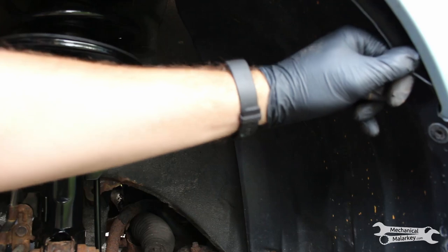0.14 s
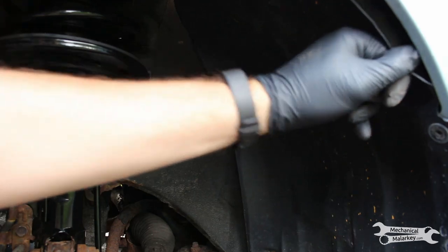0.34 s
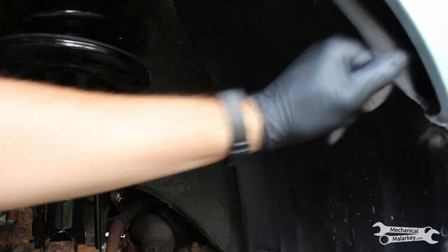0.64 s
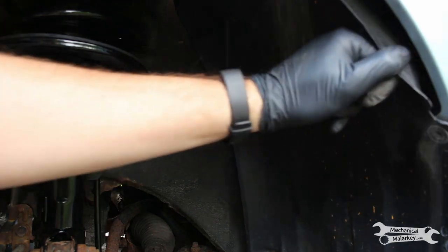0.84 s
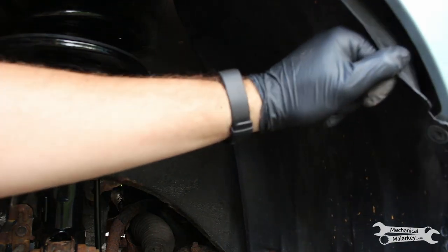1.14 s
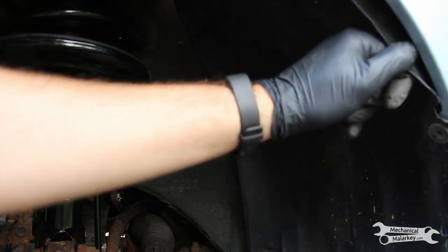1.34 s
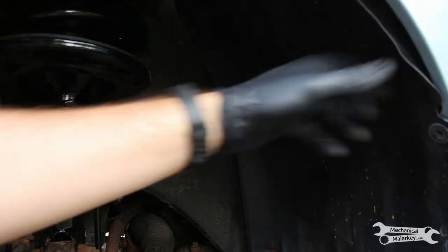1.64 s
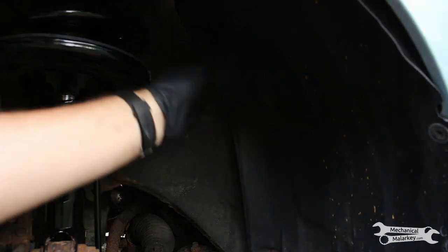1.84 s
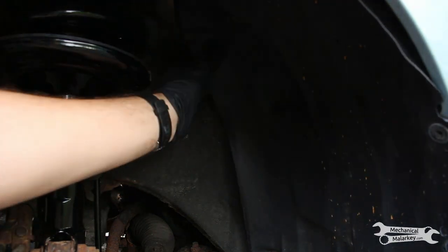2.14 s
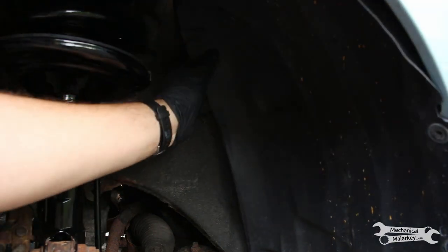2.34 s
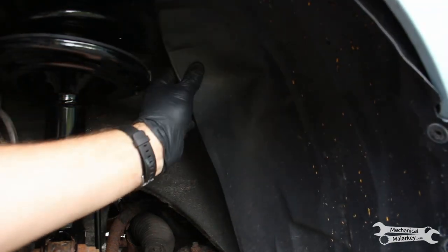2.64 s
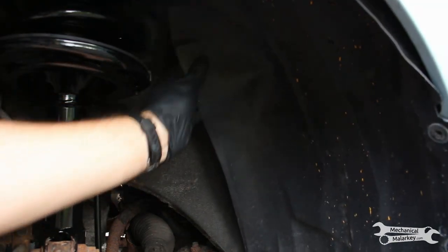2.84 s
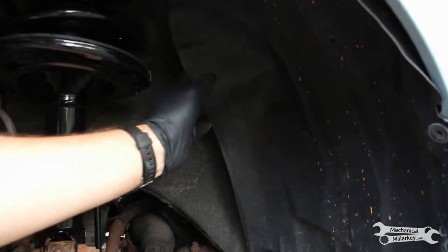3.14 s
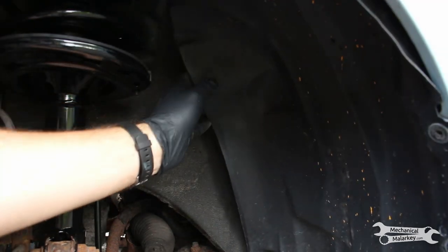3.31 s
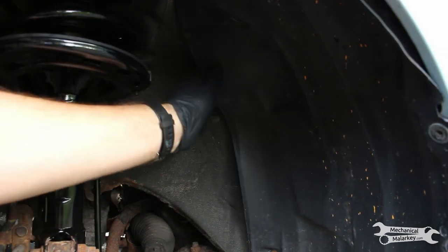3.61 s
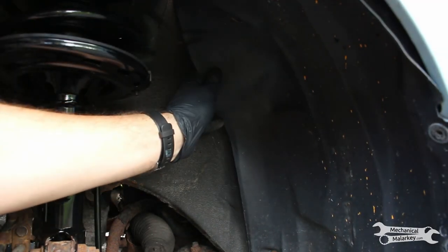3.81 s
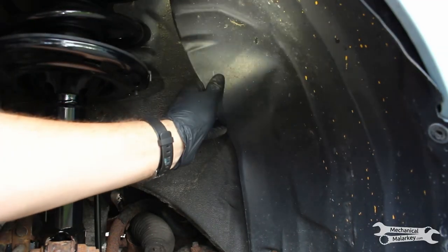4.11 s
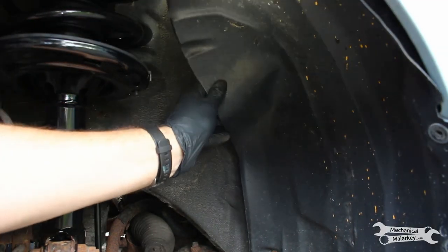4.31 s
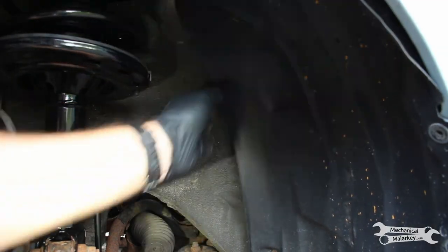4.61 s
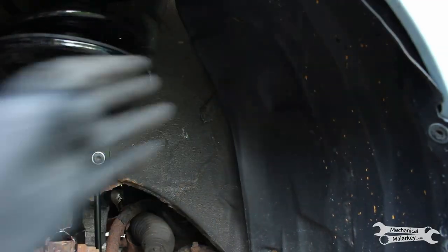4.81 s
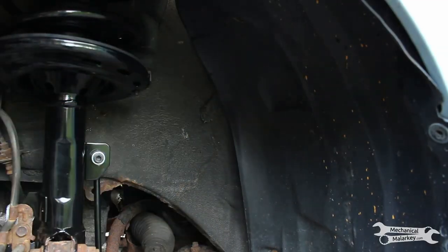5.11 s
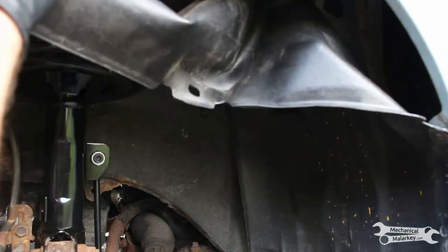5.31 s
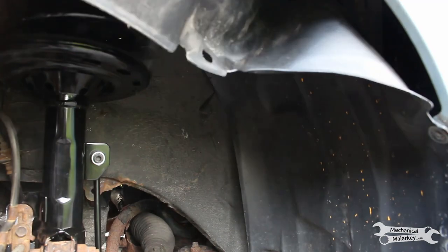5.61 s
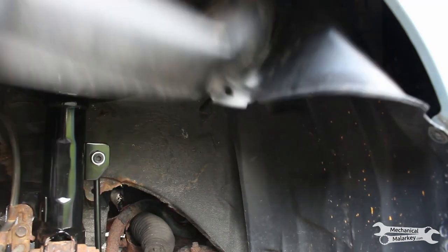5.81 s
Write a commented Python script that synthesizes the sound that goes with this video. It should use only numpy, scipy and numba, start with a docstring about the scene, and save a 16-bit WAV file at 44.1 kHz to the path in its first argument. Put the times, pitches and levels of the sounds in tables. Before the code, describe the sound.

Thin, stiff plastic sheet is bent in short jerky strokes, creaking, rubbing and knocking hollowly against a car's wheel well. The loudest cracks come early and near the end, clipping and briefly ducking the sound; between them are lighter scrapes and clicks. Close stereo microphone in an open garage with a dull tail, faint air, distant traffic, small bird chirps and cricket pulses.

```python
"""A plastic fender liner is bent and pulled out of a car's wheel well by a gloved hand, close to the microphone.
Pulls are stick-slip noise and blows are single impulses with a noisy rattle; both ring the modes of the sheet.
Low booms and ringing tones, one decaying sine each, lie under some blows; the open garage adds a dull noise tail.
Farther off: filtered-noise air and traffic, a wavering sine hum, gliding bird notes, cricket pulses and a thin trill.
Two channels share the scene, each with its own hiss; the recorder ducks and clips on the hardest snaps."""
import sys
import numpy as np
from scipy import signal
from scipy.fft import rfft, irfft
from scipy.io import wavfile
from scipy.ndimage import uniform_filter1d
from numba import njit

SR = 44100
rng = np.random.default_rng(int(sys.argv[2]) if len(sys.argv) > 2 else 0)


def digitize_waveform(pressure):
    """Quantize a signal to 16-bit integers and store it at the path in sys.argv[1].

    Rows of a 2-D input are taken as channels; values are limited to [-1, 1].
    """
    field = np.atleast_2d(pressure).T
    bounded = np.clip(field, -1, 1)
    quanta = np.round(bounded * 32767).astype(np.int16)
    wavfile.write(sys.argv[1], SR, quanta)


N = 262395
TIME = np.arange(N) / SR

# steady air of the garage: [f/Hz, relative density/dB]
AIR_COLOUR = [(25, -46), (55, -14), (90, 1.5), (130, 0.5), (260, 0), (330, 4.5), (470, -13.5), (600, -9),
              (950, -6), (1800, -16.5), (4000, -22), (16000, -29)]
# low hum and distant traffic over time: [t/s, hum level/dB, traffic level/dB]
BACKGROUND_LEVELS = [(0, -51, -45), (0.9, -48.5, -56), (1.801, -44, -48.5), (2.8, -51.5, -45),
                     (3.5, -49, -44), (4.3, -54, -41), (4.9, -48.5, -53.5), (5.95, -86, -44)]
# self-noise of each microphone channel: [f/Hz, relative density/dB]
SELF_NOISE_COLOUR = [(25, 10), (150, 4), (400, -2), (1500, -6.5), (16000, 1.5)]
# each pull or slide of the hand:
# [start t/s, length t/s, rubbing level/dB, drumming re rubbing level/dB, hiss re rubbing level/dB]
HAND_STROKES = [(0, 0.04, -31, -13, -24), (0.076, 0.045, -22.5, 0, -16.5), (0.332, 0.041, -25, -2.5, -22),
                (0.437, 0.062, -30, 0.5, -26.5), (0.525, 0.16, -28.5, -0.5, -19.5),
                (0.67, .17, -28, -6, -19), (0.838, 0.32, -35.5, -4.5, -19), (1.292, 0.09, -37.5, 2, -17),
                (1.599, 0.039, -27, 1, -13), (1.98, 0.097, -34, -4, -29), (2.094, 0.097, -28.5, -1, -19),
                (2.172, 0.084, -30.5, 1, -17), (2.334, 0.069, -27, -2.5, -22.5),
                (2.411, 0.083, -29.5, 6.5, -19), (2.554, 0.12, -30, -2, -24),
                (2.989, 0.03, -28.5, -16, -22), (3.036, 0.041, -26.5, -6, -18),
                (3.201, 0.037, -29.5, -2.5, -13.5), (3.399, 0.096, -29, -2.5, -18),
                (3.508, 0.053, -26.5, 4, -23), (3.586, 0.13, -38, 2, -9), (3.697, 0.15, -48.5, 4, -2),
                (4.047, .04, -34, 4, -16), (4.495, 0.21, -32, -4, -16), (4.605, 0.058, -17.5, -1, -15),
                (4.709, 0.033, -29.5, 1, -18), (5.062, 0.12, -51, -6, 6), (5.303, 0.098, -27.5, -0.5, -19),
                (5.444, 0.052, -36.5, -9, -24), (5.504, 0.082, -30.5, -13, -9.5),
                (5.587, 0.073, -24.5, -2, -9), (5.677, 0.1, -37.5, 0, -13), (5.794, 0.16, -25.5, -6.5, -25)]
# dying away after a stroke, lows slowly and hiss quickly: [T60/s] for drumming, knock, crack, tick
RELEASE_TIMES = [0.2, 0.15, 0.11, 0.072]
# borders between drumming, knock, crack and tick: [f/Hz]
RANGE_EDGES = [450, 1500, 5000]
# modes of the liner in its well, before bending: [f/Hz, T60/s, relative level/dB]
LINER_MODES = [(168, 0.26, -20), (278.3, 0.17, -7), (336.9, 0.21, 10.5), (361, 0.031, 0), (558, 0.017, 5),
               (641, 0.22, 5), (760, 0.03, 0), (841, 0.037, 1.5), (960, 0.19, 5.5), (1177, 0.075, -5),
               (1420, 0.21, -35), (1676, 0.43, -1), (2186, 0.078, 1.5), (2794, 0.047, -3.5),
               (3540, 0.066, -17), (4630, 0.082, -6)]
# broad colour of the sheet: [f/Hz, level/dB]
SHEET_COLOUR = [(30, -30), (70, -10.5), (130, -2), (300, 1.5), (480, 0.5), (650, 6.5), (1200, 1),
                (2000, -9.5), (3200, -12.5), (5000, -21.5), (8000, -24.5), (13000, -29), (16000, -39)]
# the broad sheet bumps against the well: [t/s, strength level/dB, hardness/(dB per range), rattle T60/s]
SHEET_KNOCKS = [(0.0211, -23.5, -0.5, 0.048), (0.0882, -24.5, 3.5, 0.068), (0.533, -19, 2, 0.057),
                (1.962, -21, -3, 0.14), (2.434, -15, -5.5, 0.044), (3.538, -29, -4, 0.026),
                (4.385, -29, 5.5, 0.056), (4.668, -10, -1.5, 0.061), (4.962, -11.5, -7.5, 0.11),
                (4.976, -18, 2.5, 0.067), (5.313, -20.5, 4, 0.091), (5.608, -17.5, 4, 0.063),
                (5.88, -15, -4.5, 0.018), (5.92, -16, 4, 0.032)]
# the bent edge sticks and snaps free: [t/s, strength level/dB, hardness/(dB per range), rattle T60/s]
EDGE_SNAPS = [(0.5198, -19.5, -11.5, 0.11), (0.579, -25.5, 3.5, 0.064), (0.6658, -3.5, 4.5, 0.086),
              (0.788, -38.5, 3, .1), (0.922, -13, 1, 0.073), (0.962, -32.5, 7.5, 0.018),
              (0.9956, -15, 1, 0.077), (1.007, -25.5, -7, 0.029), (1.04, -22, 1, 0.043),
              (1.056, -34, -2, 0.05), (1.102, -22.5, -6.5, .03), (1.1373, -26.5, 1.5, 0.049),
              (1.163, -29.5, -7, 0.027), (1.2558, -15, 1, .055), (1.303, -28.5, 3.5, 0.077),
              (1.329, -33, 3.5, 0.022), (1.348, -29.5, -5, .06), (1.361, -32, 2.5, 0.059),
              (1.625, -22.5, -0.5, 0.062), (3.044, -24.5, 2.5, 0.055), (4.62, -23, -1, 0.1),
              (5.768, -16, 2.5, 0.38), (5.778, -8, -7, 0.099)]
# clips and hard rims click: [t/s, strength level/dB, hardness/(dB per range), rattle T60/s]
CLIP_CLICKS = [(0.6627, -11.5, -4, 0.079), (0.863, -41, 3, 0.11), (1.231, -49, 6.5, 0.06),
               (1.41, -58, 7.5, 0.04), (2.066, -41.5, 3.5, 0.056), (2.497, -30.5, -2.5, 0.057),
               (2.651, -31, -4, 0.046), (2.704, -25, -6.5, 0.047), (2.83, -30.5, -2.5, 0.071),
               (2.8835, -20, -6, 0.086), (2.929, -24.5, -3, 0.065), (3.241, -29.5, -5, 0.044),
               (3.6444, -22, -2.5, 0.042), (3.886, -50, 7, 0.061), (4.0209, -40, 5, 0.011),
               (4.201, -46.5, 5.5, 0.019), (4.952, -49.5, 2, .02), (5.373, -26, -2.5, 0.045),
               (5.474, -45.5, 3.5, 0.051), (5.563, -27, -1, 0.18), (5.792, -8, -1.5, 0.075),
               (5.805, -8.5, -5, 0.051)]
# colour of each kind of blow: [drumming, knock, crack, tick relative level/dB]
KNOCK_COLOUR = [-5, -1, -20, -37.5]
SNAP_COLOUR = [-17.5, 0, -6.5, -26.5]
CLICK_COLOUR = [-7, -1, -0.5, -4]
# low booms and ringing tones under some blows: [t/s, f/Hz, level/dB, T60/s]
BOOMS_AND_RINGS = [(0.112, 137, -19.5, 0.2), (0.129, 107, -20, 0.2), (0.661, 56, -11, 0.043),
                   (1.258, 612.5, -9, 0.11), (2.366, 239, -12, 0.11), (2.439, 203, -26.5, .16),
                   (3.047, 556, -11.5, 0.13), (4.672, 306, -14, 0.17), (4.964, 322, -16, 0.27),
                   (5.791, 265, -10, 0.18)]
# bird chirps: [middle t/s, middle f/Hz, glide/octaves, relative level/dB]
BIRD_CHIRPS = [(0.333, 4600, -0.11, -43), (0.418, 5300, 0.1, -38), (1.673, 4700, -0.22, -36),
               (1.724, 4640, -0.31, -38), (1.752, 5280, -0.21, -36.5), (1.784, 4840, -.2, -38.5),
               (2.208, 5200, 0.058, -39), (2.262, 5300, .14, -38), (2.478, 4630, -0.17, -39),
               (2.525, 4680, -0.19, -42), (2.582, 4600, -0.15, -36), (2.636, 4700, -0.15, -34),
               (3.128, 5050, 0.19, -41), (3.365, 4750, 0.2, -47), (3.4, 4750, -.18, -43),
               (3.515, 4670, -.16, -38), (3.563, 4800, -.18, -39), (3.617, 4780, -.18, -35),
               (3.675, 4750, -0.12, -39)]
# cricket pulses: [middle t/s, level/dB]
CRICKET_PULSES = [(1.465, -58), (1.515, -52), (1.565, -52), (2.289, -50), (2.975, -48), (3.03, -49),
                  (3.99, -55)]


def undb(db):
    """Decibels to gain."""
    return 10 ** (np.asarray(db) / 20)


def unit(x):
    """Scale to an rms of one."""
    return x / np.sqrt(np.mean(x ** 2) + 1e-20)


def fade(t, t60):
    """Exponential decay, 60 dB down after t60 (2 ms at least)."""
    return np.exp(-np.log(1000) * t / max(t60, .002))


def add(track, s, x):
    """Mix x into the track from time s."""
    i = int(np.clip(s * SR, 0, N - 1))
    track[i:i + len(x)] += x[:N - i]


def colour(x, points, size=4096):
    """Causal minimum-phase filter with a smooth (f/Hz, level/dB) response."""
    hz, db = np.transpose(points)
    grid = np.maximum(np.fft.rfftfreq(size, 1 / SR), 1)
    log_gain = np.log(undb(np.interp(np.log(grid), np.log(hz), db)))
    # folding the cepstrum forward in time makes the filter causal
    cepstrum = irfft(log_gain)
    cepstrum[1:size // 2] *= 2
    cepstrum[size // 2 + 1:] = 0
    response = irfft(np.exp(rfft(cepstrum)))
    return signal.fftconvolve(x, response)[:len(x)]


def ranges(x):
    """Split into drumming, knock, crack and tick ranges."""
    a, b, c = RANGE_EDGES
    shapes = [(a, "low"), ([a, b], "band"), ([b, c], "band"), (c, "high")]
    filters = [signal.butter(3, hz, kind, fs=SR, output="sos") for hz, kind in shapes]
    return [signal.sosfilt(sos, x) for sos in filters]


def walk(rate):
    """Smoothed random steps, rate per second, with an rms near one."""
    k = int(SR / rate)
    steps = np.repeat(rng.standard_normal(N // k + 1), k)
    return unit(uniform_filter1d(steps, k)[:N])


def garage(x, room_db=-19, t60=0.85):
    """Dull reverberation from the walls: a decaying noise tail with a 10 ms rise."""
    t = TIME[:SR]
    tail = rng.standard_normal(len(t)) * fade(t, t60) * np.minimum(t / 0.01, 1)
    wet = signal.fftconvolve(x, tail / np.linalg.norm(tail))[:N]
    return x + undb(room_db) * colour(wet, [(400, -17.0), (1500, -1), (6000, -33)])


def air(level_db=-43.5):
    """Steady air of the garage: coloured noise whose level drifts slightly."""
    return unit(colour(rng.standard_normal(N), AIR_COLOUR)) * undb(level_db + 1.9 * walk(2.87))


def hum(mean_hz=124):
    """A faint low sine, wavering in pitch and level."""
    s, level_db, _ = np.transpose(BACKGROUND_LEVELS)
    hz = mean_hz * (1 + 0.0383 * walk(25.15))
    tone = np.sin(2 * np.pi * np.cumsum(hz) / SR)
    return unit(tone * undb(1.3 * walk(14))) * undb(np.interp(TIME, s, level_db))


def traffic():
    """Distant traffic: noise strongest around 650 Hz, swelling and sinking."""
    s, _, level_db = np.transpose(BACKGROUND_LEVELS)
    points = [(100, -22), (350, 0), (650, 5.0), (900, -2.5), (1500, -14.5), (4000, -28.5)]
    return unit(colour(rng.standard_normal(N), points)) * undb(np.interp(TIME, s, level_db))


def insect_trill(hz=6350, width_hz=250, level_db=-63.0):
    """Insects keep up a thin trill: noise in one narrow resonance, flickering in level."""
    resonance = signal.iirpeak(hz, hz / width_hz, fs=SR)
    trill = unit(signal.lfilter(*resonance, rng.standard_normal(N)))
    return undb(level_db + 1.6 * walk(27.4)) * trill


def liner(force, modes_db, spread_db=4):
    """The sheet passes a force on directly and rings; each contact point weights the modes anew."""
    t = TIME[:SR // 3]
    response = np.zeros(len(t))
    draws = rng.standard_normal((len(LINER_MODES), 2))
    for (hz, t60, db), (weight, bend) in zip(LINER_MODES, draws):
        # bending shifts the modes a little
        bent_hz = hz * (1 + 0.014 * bend)
        decay = fade(t, t60)
        ring = np.cos(2 * np.pi * bent_hz * t) * decay
        response += undb(modes_db + db + spread_db * weight) * ring / np.sum(decay)
    response[0] += 1  # the direct path
    return colour(signal.fftconvolve(force, response)[:len(force)], SHEET_COLOUR)


def pulls(swell_share=.5, crack_share=0.53, crack_db=0, jerk_db=2, jerks_per_s=50):
    """Strength of the rubbing in the four ranges: every stroke swells, holds and lets go."""
    power = np.zeros((len(RELEASE_TIMES), N))
    for start, length, rub, drum, hiss in HAND_STROKES:
        t = TIME[:int((length + max(RELEASE_TIMES)) * SR)]
        # the hand gathers speed over a share of the stroke
        swell = np.sin(np.pi / 2 * np.minimum(t / (swell_share * length), 1))
        # the crackle follows both the rubbing and the hiss
        levels = rub + np.array([drum, 0, (1 - crack_share) * hiss + crack_db, hiss])
        for track, db, t60 in zip(power, levels, RELEASE_TIMES):
            release = fade(np.maximum(t - length, 0), t60)
            add(track, start, (undb(db) * swell * release) ** 2)
    # the hand never pulls evenly
    return np.sqrt(power) * undb(jerk_db * walk(jerks_per_s))


def stick_slip(n, slips_per_s, smear_t60, hiss_db, slip_spread_db=3.0):
    """A crowd of uneven little slips over the hiss of plastic sliding; the denser, the smaller each."""
    t = TIME[:SR // 20]
    chance, size, sign = rng.random(n), rng.exponential(size=n), rng.choice([-1, 1], n)
    happens = chance < slips_per_s / SR
    height = undb(slip_spread_db * np.minimum(size, 2.5)) / np.sqrt(slips_per_s)
    # each slip is a sharp edge with a short noisy tail
    smear = rng.standard_normal(len(t)) * fade(t, smear_t60)
    smear[0] = np.linalg.norm(smear) / 2
    slips = signal.fftconvolve(happens * sign * height, smear)[:n]
    return unit(slips) + undb(hiss_db) * rng.standard_normal(n)


def scrapes(easy_slips_per_s=150, haste=.8, easy_db=-31):
    """Stick-slip drives the sheet from a contact point that moves on every tenth of a second."""
    strength = pulls()
    parts, n = np.zeros((4, N)), SR // 5
    window = signal.windows.cosine(n)
    for start in np.arange(0, N / SR, n / 2 / SR):
        # a pull harder than easy_db slips more often
        pull = np.interp(start + TIME[:n], TIME, strength[1])
        speed = np.maximum(1, pull / undb(easy_db)) ** haste
        # slow, coarse jerks make the creak; the fine grain of the surface makes the hiss
        coarse = stick_slip(n, easy_slips_per_s * speed, smear_t60=0.034, hiss_db=-12.0)
        fine = stick_slip(n, 1200, smear_t60=0.0032, hiss_db=-5.5)
        creak = colour(coarse, [(1500, -2.5), (3500, -3.5), (7000, -29.0)])
        grain = colour(fine, [(900, -13.5), (2500, -5.5), (5000, -6.5)])
        for part, band in zip(parts, ranges(liner(creak + grain, modes_db=4))):
            add(part, start, unit(band) * window)
    return np.sum(parts * strength, axis=0)


def blows(rows, colour_db, rattle_db, tail_db, tail_t60):
    """A sudden slip: one sharp blow, then its dense reflections in sheet and well. Harder contact is brighter."""
    out, t = np.zeros(N), TIME[:SR // 3]
    for s, db, hardness_db, t60 in rows:
        rattle, tail = rng.standard_normal((2, len(t)))
        rattle = rattle * np.abs(rattle) * fade(t, t60)
        # the hollow of the well favours the low notes
        tail = colour(tail * fade(t, tail_t60), [(700, 2), (2000, -18.5), (6000, -10)])
        force = undb(rattle_db) * rattle / np.linalg.norm(rattle)
        force[0] += 1  # the sharp blow itself
        force = force / np.linalg.norm(force)
        force += undb(tail_db) * tail / np.linalg.norm(fade(t, tail_t60))
        # hardness tilts the ranges about the knock
        tilt_db = hardness_db * (np.arange(len(colour_db)) - 1)
        gains = undb(db + np.array(colour_db) + tilt_db)
        for gain, band in zip(gains, ranges(liner(force, modes_db=6.5))):
            # level is set over the first 25 ms
            add(out, s, gain * band / np.std(band[:SR // 40]))
    return out


def knocks():
    """Dull knocks of the broad sheet against the well, strongest in the knock range."""
    return blows(SHEET_KNOCKS, KNOCK_COLOUR, rattle_db=8.5, tail_db=-8.0, tail_t60=0.26)


def booms_and_rings(rise_s=0.0013):
    """Low booms and ringing tones under some blows: one decaying sine each, with a soft onset."""
    out, t = np.zeros(N), TIME[:SR // 2]
    for s, hz, db, t60 in BOOMS_AND_RINGS:
        tone = np.sin(2 * np.pi * hz * t) * fade(t, t60)
        add(out, s, undb(db) * tone * (1 - np.exp(-t / rise_s)))
    return out


def whistle(hz, octaves, length_s, overtone_db, waver=0.072):
    """One gliding note with a weak octave, its pitch wavering by waver octaves rms."""
    u = np.linspace(-.5, .5, int(length_s * SR))
    wobble = waver * unit(uniform_filter1d(rng.standard_normal(len(u)), size=40))
    phase = 2 * np.pi * np.cumsum(hz * 2 ** (octaves * u + wobble)) / SR
    return np.cos(np.pi * u) ** 2 * (np.sin(phase) + undb(overtone_db) * np.sin(2 * phase))


def bird(chirp_s=0.025, bird_db=-2):
    """A small bird twitters outside: short gliding notes with a strong short reverberation."""
    out = np.zeros(N)
    for s, hz, octaves, db in BIRD_CHIRPS:
        chirp = whistle(hz, octaves, chirp_s, overtone_db=-11.5)
        add(out, s - chirp_s / 2, undb(db + bird_db) * chirp)
    return garage(out, room_db=0, t60=.25)


def snaps():
    """Ringing snaps of the bent edge, with more crack than the dull knocks."""
    return blows(EDGE_SNAPS, SNAP_COLOUR, rattle_db=9.5, tail_db=-9, tail_t60=0.27)


def clicks():
    """Bright clicks of clips and hard rims, with a strong rattle and a short tail."""
    return blows(CLIP_CLICKS, CLICK_COLOUR, rattle_db=14, tail_db=-6, tail_t60=0.082)


def cricket(pulse_s=0.045, hz=4420):
    """A cricket pulses on one nearly steady note, with a strong short reverberation."""
    out = np.zeros(N)
    for s, db in CRICKET_PULSES:
        pulse = whistle(hz, 0, pulse_s, overtone_db=-28, waver=0.013)
        add(out, s - pulse_s / 2, undb(db) * pulse)
    return garage(out, room_db=0, t60=.25)


def scene(self_noise_db=-54):
    """Both microphone channels hear the same scene; each adds its own faint hiss."""
    near = garage(scrapes() + knocks() + booms_and_rings() + snaps() + clicks())
    far = air() + hum() + traffic() + insect_trill() + bird() + cricket()
    hiss = [unit(colour(noise, SELF_NOISE_COLOUR)) for noise in rng.standard_normal((2, N))]
    return near + far + undb(self_noise_db) * np.array(hiss)


@njit
def follow(x, attack, release):
    """Envelope with its own speeds of rising and sinking."""
    out, e = np.empty(len(x)), 0.
    for i in range(len(x)):
        e += (x[i] - e) * (attack if x[i] > e else release)
        out[i] = e
    return out


def record(dry, ceiling_db=-4, attack_s=.00006, release_s=0.087, delay_s=.01, top_hz=15900):
    """Gain control reacts late to loud snaps: the peaks clip, then everything ducks. The top is cut."""
    loudest = np.abs(dry).max(axis=0)
    peaks = follow(loudest, min(1., 1 / (attack_s * SR)), 1 / (release_s * SR))
    excess = np.maximum(0, peaks / undb(ceiling_db) - 1)
    late = follow(excess, 1 / (delay_s * SR), 1 / (delay_s * SR))
    held = np.clip(dry / (1 + late), -1, 1)
    return signal.sosfilt(signal.ellip(10, .2, 70, top_hz, fs=SR, output="sos"), held)


dry = scene()
out = record(dry)
digitize_waveform(out)
```